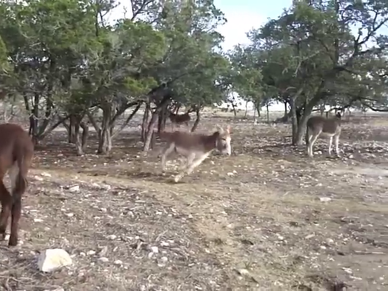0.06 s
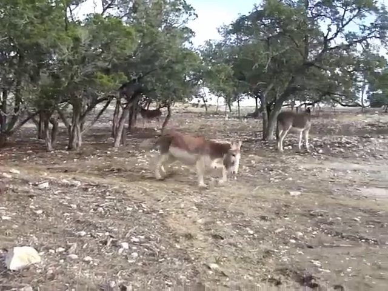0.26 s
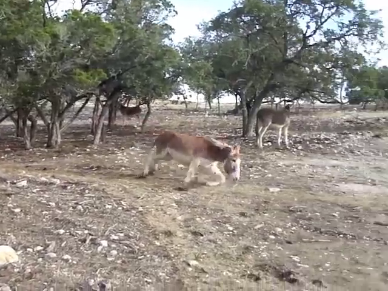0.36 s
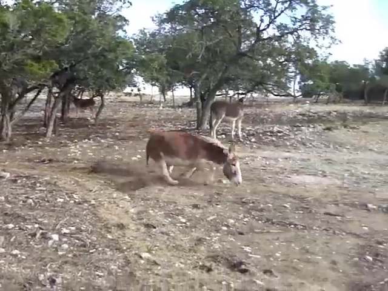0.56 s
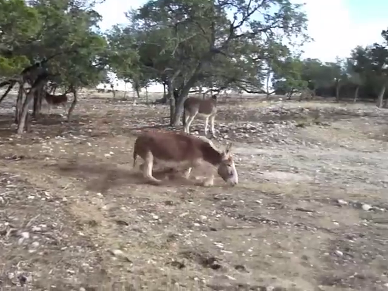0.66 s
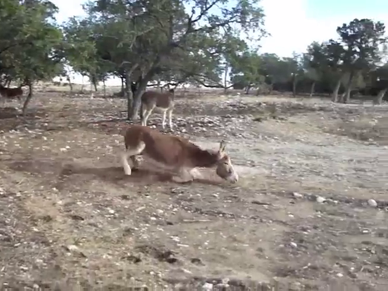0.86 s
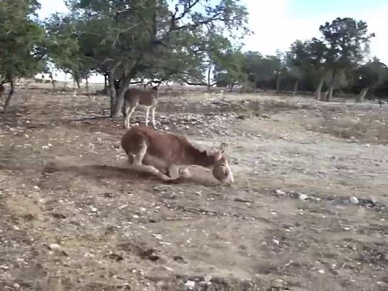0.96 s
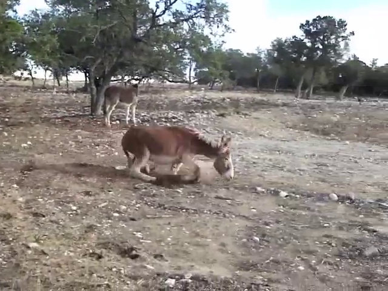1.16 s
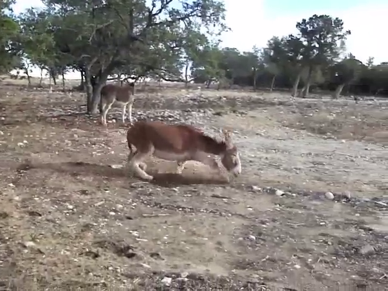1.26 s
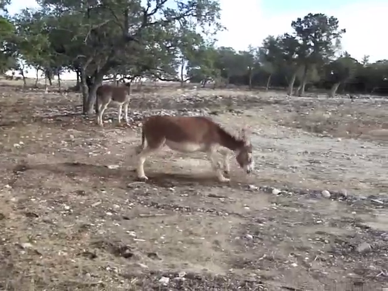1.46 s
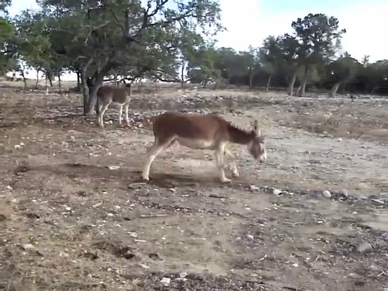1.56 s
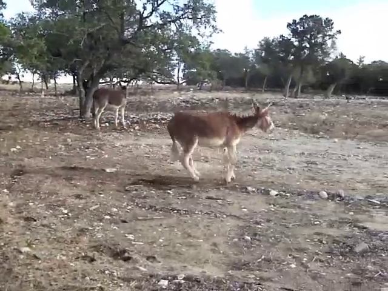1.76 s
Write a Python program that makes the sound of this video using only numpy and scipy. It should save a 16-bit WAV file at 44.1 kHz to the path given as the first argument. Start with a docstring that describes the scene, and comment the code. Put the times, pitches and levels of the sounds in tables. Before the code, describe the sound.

A donkey stumbles and slides on gravel, hooves thudding and stones crunching in light wind.

```python
"""A light wind hisses in the trees of an open paddock, and gravel stirs under a running donkey.
It stumbles: stones snap and clack, and its hooves knock and thud on the packed earth.
It goes down and slides on its knees, dragging loose gravel and crunching stones under its body.
Then it gets up again with a few more thuds, the gravel dies down, and a last soft step lands."""
import sys
import numpy as np
from scipy import signal
from scipy.fft import rfft, irfft, next_fast_len
from scipy.io import wavfile
from scipy.ndimage import map_coordinates

SR = 44100
rng = np.random.default_rng(int(sys.argv[2]) if len(sys.argv) > 2 else 0)


def pcm_store(signal):
    """Save signal as 16-bit PCM."""
    levels = np.round(np.clip(np.atleast_2d(signal), -1, 1) * 32767)
    wavfile.write(sys.argv[1], SR, levels.astype(np.int16).T)


N = 79380


def amp(db):
    """Decibels to gain."""
    return 10 ** (np.asarray(db) / 20)


def unit(x):
    """Scale to rms 1."""
    return x / np.sqrt(np.mean(x ** 2) + 1e-20)


def along(points, hz):
    """Read a curve of (Hz, value) points on a log frequency axis."""
    f, v = np.transpose(points)
    return np.interp(np.log(hz + 1), np.log(f + 1), v)


def wobble(rate):
    """A smooth random curve with `rate` knots a second."""
    return map_coordinates(rng.standard_normal(N // 8), [np.arange(N) * rate / SR], mode="mirror")


def filtered(x, response):
    """Shape x with a frequency response."""
    size = next_fast_len(2 * len(x))
    return irfft(rfft(x, size) * response(np.fft.rfftfreq(size, 1 / SR)), size)[:len(x)]


def resonance(f, hz, q):
    """A band-pass resonance with gain 1 at its centre."""
    return 1j * f * hz / q / (hz * hz - f * f + 1j * f * hz / q)


def decay(t, t60):
    """A fade that loses 60 dB in t60 seconds."""
    return np.exp(-np.log(1000) * t / t60)


def ringing(modes):
    """Damped tones of alternating sign from (Hz, dB, t60 in seconds) rows."""
    t = np.arange(SR // 16) / SR
    return sum((-1) ** k * amp(db) * np.cos(2 * np.pi * hz * t) * decay(t, t60)
               for k, (hz, db, t60) in enumerate(modes))


def add(track, start, db, sound):
    """Mix in one hit with the energy of 4 ms of sound at the given level."""
    i = max(0, round(start * SR))
    sound = sound * np.sqrt(.004 * SR) / (np.linalg.norm(sound) + 1e-12)
    track[i:i + len(sound)] += amp(db) * sound[:N - i]


def wind(level_db=-53):
    """Wind in the trees: a steady, slightly restless bed of hiss."""
    # Each row: frequency in Hz, level in dB.
    spectrum = [(25, -7), (100, -5.5), (180, -10.5), (281, -1), (492, -8), (1000, -9), (3160, -24),
                (5670, -12), (11000, -15)]
    sway = amp(level_db + 0.44 * wobble(8.7))
    return sway * unit(filtered(rng.standard_normal(N), lambda f: amp(along(spectrum, f))))


def gravel(grains_per_s=2000, spread_db=5.5, clump_db=4.5, dust_db_per_s=3):
    """Hooves and body drag loose gravel: sliding sand with clumps of grit ticking in it."""
    # The swell of the slide. Each row: time in seconds, level in dB.
    slide = [(0, -47.5), (.19, -54), (.215, -44.5), (.26, -53.5), (.34, -40), (.45, -43.5), (.51, -43),
             (.6, -34.5), (.68, -38), (.72, -36.5), (.78, -43), (.87, -38), (.91, -41.5), (1.02, -41.5),
             (1.13, -45), (1.19, -44), (1.24, -37.5), (1.35, -45), (1.55, -49), (1.73, -53), (1.8, -45)]
    # The gravel's tone. Each row: frequency in Hz, level in dB.
    spectrum = [(60, -4), (150, 6), (350, -4.5), (550, 2), (800, -3), (1500, -2), (3000, -3), (4500, -3),
                (8000, -5.5), (11000, -6)]
    colour = lambda f: amp(along(spectrum, f)) * f ** 2 / (f ** 2 + 80 ** 2)
    t = np.arange(N) / SR
    grains = (rng.random(N) < grains_per_s / SR) * rng.choice([-1, 1], N)
    grains = grains * amp(spread_db * np.minimum(rng.exponential(size=N), np.pi))
    sand = amp(-1.5) * unit(filtered(rng.standard_normal(N), colour))
    clumps = grains * amp(clump_db * np.tanh(wobble(210)))
    grit = amp(0.5) * unit(filtered(clumps, lambda f: colour(f) * f / (f + 803)))
    spray = (sand + grit) * amp(0.77 * wobble(44.76))
    dust = filtered(spray, lambda f: f ** 2 / (f ** 2 + 4500 ** 2))
    dust_gain = amp(dust_db_per_s * (t - t.mean()))  # the spray turns finer as the slide goes on
    return amp(np.interp(t, *np.transpose(slide))) * (spray - dust + dust * dust_gain)


def snaps(q=1.234, roll_off=1.444, spill_db=-9.0, spill_s=0.00604):
    """Pebbles and twigs snap: one dry click each, with a faint spill of grit."""
    # Each row: start in seconds, level in dB, centre in Hz.
    hits = [(0.1369, -43.5, 8300), (.4674, -22.5, 3070), (0.7593, -37, 2210), (.8564, -35.5, 8000),
            (.9272, -27, 3175), (1.1005, -27.5, 4860), (1.1487, -19.5, 4610), (1.178, -32.5, 8200),
            (1.608, -39, 8000)]
    out, t = np.zeros(N), np.arange(SR // 16) / SR
    for start, db, hz in hits:
        spill = rng.standard_normal(len(t)) * np.exp(-t / spill_s)
        click = (t == 0) + amp(spill_db) * spill / np.linalg.norm(spill)
        top_hz = roll_off * hz
        low_pass = lambda f: 1 / (1 + 1j * f / top_hz - (f / top_hz) ** 2)
        add(out, start, db, filtered(click, lambda f: resonance(f, hz, q) * low_pass(f)))
    return out


def contacts(hits, q, strike, spiky, low_cut, tail_db, tail_s, ring, lead):
    """Each blow is a scuff, a hard contact and a burst of smaller ones, coloured by stone and hoof."""
    # The short ring of a hoof on rock. Each row: frequency in Hz, Q, level in dB.
    modes = [(513, 10.3, 8), (1598, 1.22, -3.5), (2662, 8.8, -1), (3331, 23, -0.5), (5420, 5.7, -21)]
    hoof = lambda f: 1 + ring * sum(amp(db) * resonance(f, hz, sharp) for hz, sharp, db in modes)
    out, onset = np.zeros(N), SR // 50
    t = (np.arange(SR // 8) - onset) / SR
    for start, db, hz, length in hits:
        burst = rng.standard_normal(len(t))
        burst *= np.exp(spiky * np.clip(rng.standard_normal(len(t)), -2, 2))
        scuff = .5 * np.exp(-abs(t) / (lead * length))
        release = np.exp(-(t / length) ** 2) + amp(tail_db) * np.exp(-abs(t) / tail_s)
        envelope = np.where(t < 0, scuff, release)
        burst *= envelope / np.linalg.norm(burst * envelope)
        burst[onset] += strike / (1 + length / tail_s)  # shorter blows get a harder click
        stone = lambda f: resonance(f, hz, q) * 1j * f / (1j * f + low_cut * hz)
        add(out, start + t[0], db, filtered(burst, lambda f: stone(f) * hoof(f)))
    return out


def stone_crunches():
    """Stones clack and are crushed underfoot: bright, broad and spiky."""
    # Each row: contact time in seconds, level in dB, centre in Hz, burst length in seconds.
    hits = [(.2028, -22.5, 2110, 0.00247), (.2465, -34, 1800, 0.0179), (.2825, -29, 2650, 0.00344),
            (.324, -18.5, 3910, 0.00372), (.4676, -23, 2067, 0.00437), (.5192, -26, 2600, 0.0163),
            (.556, -36, 1510, 0.0154), (.578, -18.5, 2800, 0.0054), (.6395, -22.5, 7600, 0.0014),
            (.6485, -28, 3900, 0.0068), (.9575, -30, 6000, 0.0032), (.968, -24.5, 3620, 0.001),
            (.9714, -21, 2970, 0.00071), (.9955, -28, 3620, 0.0087), (1.009, -34.5, 3020, 0.0044),
            (1.096, -25.5, 3700, 0.0026), (1.222, -28.5, 3880, 0.015), (1.244, -17.5, 3940, 0.0075),
            (1.2575, -28.5, 4100, 0.0031), (1.312, -31, 2600, 0.008), (1.551, -32, 3900, 0.0025),
            (1.6905, -35.5, 4190, 0.0044)]
    return contacts(hits, q=0.527, strike=1.0, spiky=0.438, low_cut=0.076,
                    tail_db=-8, tail_s=0.0055, ring=0.656, lead=0.55)


def knocks():
    """Hooves and knees strike earth and bedded rock with a round, midrange knock."""
    # Each row: contact time in seconds, level in dB, centre in Hz, burst length in seconds.
    hits = [(.2045, -34.5, 590, 0.0086), (.2715, -34, 610, 0.0023), (.2795, -20, 551, 0.0056),
            (.5548, -25, 468, 0.00253), (.579, -23.5, 627, 0.01437), (.6122, -23, 1064, 0.0029),
            (.614, -28, 289, 0.0051), (1.011, -36, 364, 0.0247), (1.038, -36.5, 765, 0.0185),
            (1.097, -33.5, 613, 0.0046), (1.243, -29, 589, 0.0103), (1.322, -33.5, 395, 0.0079),
            (1.741, -43.5, 904, 0.0125), (1.783, -36.5, 695, 0.043)]
    return contacts(hits, q=1.97, strike=0.78, spiky=0.132, low_cut=0.168,
                    tail_db=-15.5, tail_s=0.014, ring=0.276, lead=0.28)


def thuds(attack_s=0.0068, sag=0.208, sag_s=0.0047, soil_hz=200.7):
    """Weight lands on the earth: a few low cycles that sag in pitch, with a dull puff of soil."""
    # Each row: start in seconds, level in dB, settled pitch in Hz, t60 in seconds.
    landings = [(.205, -25, 150, 0.0583), (.279, -25.5, 269.1, 0.0286), (.283, -30.5, 140.3, 0.0485),
                (.328, -31.5, 139.6, 0.076), (.553, -28.5, 167, 0.0387), (.583, -25.5, 133, 0.0464),
                (.614, -32, 142.3, 0.09), (0.651, -34, 134.3, 0.033), (0.809, -35, 165.3, 0.032),
                (.85, -37, 131, 0.0238), (1.012, -32.5, 222.5, 0.0122), (1.047, -33.5, 119, 0.046),
                (1.099, -33.5, 132.5, 0.0392), (1.235, -27.5, 180, 0.0158), (1.244, -32, 109.3, 0.076),
                (1.323, -30, 114.3, 0.085), (1.365, -39.5, 149, 0.0227), (1.741, -43, 185, 0.0336),
                (1.787, -37, 150.5, 0.055)]
    out, t = np.zeros(N), np.arange(SR // 6) / SR
    attack = 1 - np.exp(-t / attack_s)
    for start, db, hz, t60 in landings:
        phase = 2 * np.pi * np.cumsum(hz * (1 + sag * np.exp(-t / sag_s))) / SR
        soil = unit(filtered(rng.standard_normal(len(t)), lambda f: resonance(f, soil_hz, 0.496) ** 2))
        add(out, start, db, (np.sin(phase) + 0.356 * soil) * attack * decay(t, t60))
    return out


def clop():
    """A hoof lands flat, toe then heel, and its hollow sole rings as it closes on the ground."""
    # Each row: start in seconds, level in dB.
    toe_and_heel = [(.2797, -27), (0.2819, -22.5)]
    # Each row: frequency in Hz, level in dB, t60 in seconds.
    sole_modes = [(450, 0, .018), (830, -2, .013), (1330, 0, .017)]
    out = np.zeros(N)
    for start, db in toe_and_heel:
        add(out, start, db, ringing(sole_modes))
    return out


def ringing_stones(vary_db=2.5):
    """A loose rock rings in all its modes, differently at each contact; pebbles ping on one note."""
    # A skidding hoof strikes the rock. Each row: start in seconds, level in dB.
    clacks = [(0.3242, -18.5), (0.3259, -23), (1.2456, -29.5)]
    # Each row: frequency in Hz, level in dB, t60 in seconds.
    rock_modes = [(2600, -4, 0.0089), (3490, 2, 0.0114), (4696, -1, 0.0114), (5440, -7, 0.011),
                  (6124, -7.5, 0.0059), (7440, -4, 0.0097), (8024, -5, 0.0076)]
    # Each row: start in seconds, level in dB, pitch in Hz, t60 in seconds.
    pings = [(.8564, -32.5, 9250, .005), (1.6905, -40, 5150, .018)]
    out = np.zeros(N)
    for start, db in clacks:
        modes = [(hz, level + vary_db * rng.standard_normal(), t60) for hz, level, t60 in rock_modes]
        add(out, start, db, ringing(modes))
    for start, db, hz, t60 in pings:
        add(out, start, db, ringing([(hz, 0, t60)]))
    return out


def scatter(x):
    """The ground and the trees answer with a thin, short tail."""
    # Each row: frequency in Hz, t60 in seconds.
    decay_times = [(150, 0.292), (1500, 0.202), (9000, 0.0735)]
    hz, t, noise = signal.stft(rng.standard_normal(SR // 3), SR, nperseg=256)
    tail = signal.istft(noise * decay(t, along(decay_times, hz)[:, None]), SR, nperseg=256)[1]
    return signal.fftconvolve(x, tail / np.linalg.norm(tail))[:N]


def scene():
    """The hits and their outdoor tail over gravel and wind, in mono."""
    blows = stone_crunches() + knocks() + clop()
    earth = thuds()
    ticks = snaps() + ringing_stones()
    tail = amp(-16) * scatter(blows + amp(-3.5) * (earth + ticks))
    return (blows + earth + ticks + tail + gravel() + wind())[None]


def record(dry, low_cut_hz=59.8, top_hz=11120):
    """A small microphone with a bass cut and a steep band limit."""
    # The microphone's tone. Each row: frequency in Hz, gain in dB.
    tone = [(100, -1.5), (1000, 1.5), (3000, 0), (4200, -3.5), (6000, -2.5), (9500, -4), (11000, -15)]
    thin = signal.sosfilt(signal.butter(2, low_cut_hz, "highpass", fs=SR, output="sos"), dry[0])
    return filtered(thin, lambda f: amp(along(tone, f)) / np.sqrt(1 + (f / top_hz) ** 240))[None]


dry = scene()
out = record(dry)
pcm_store(out)
```